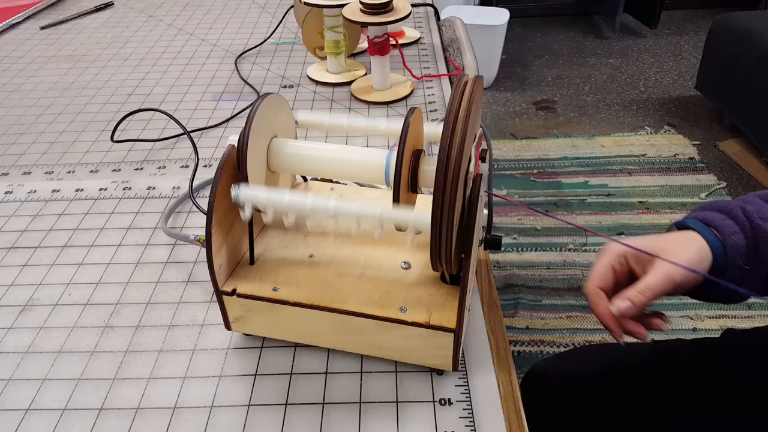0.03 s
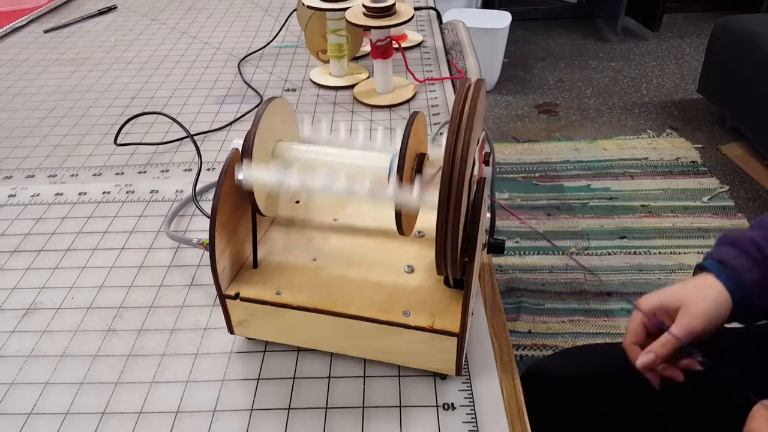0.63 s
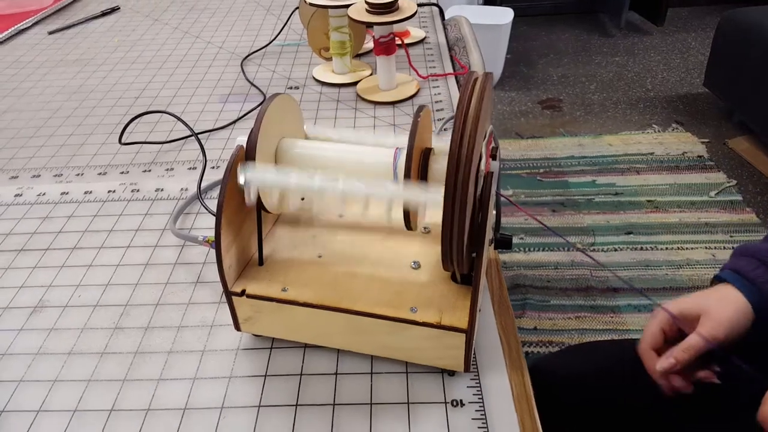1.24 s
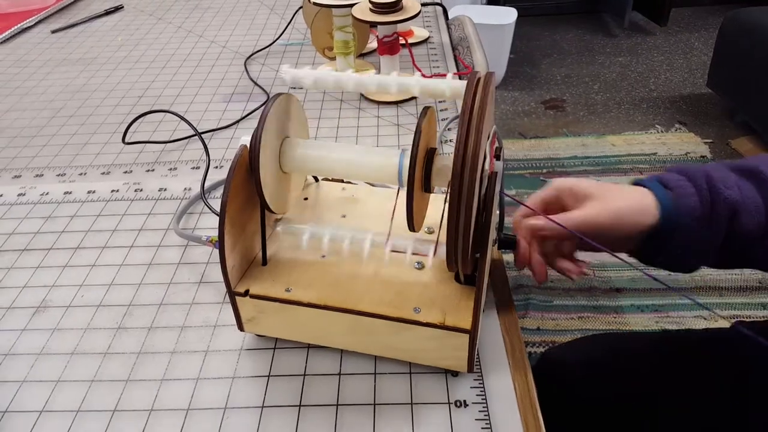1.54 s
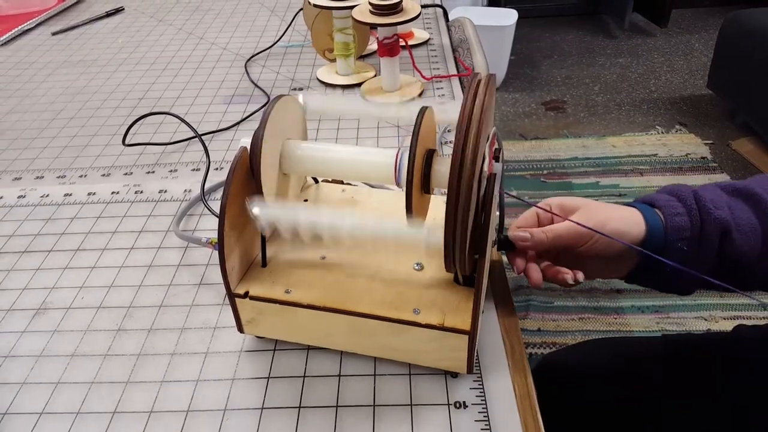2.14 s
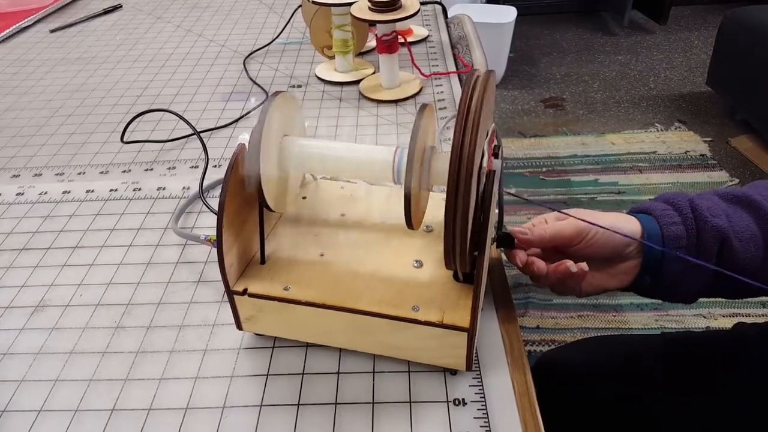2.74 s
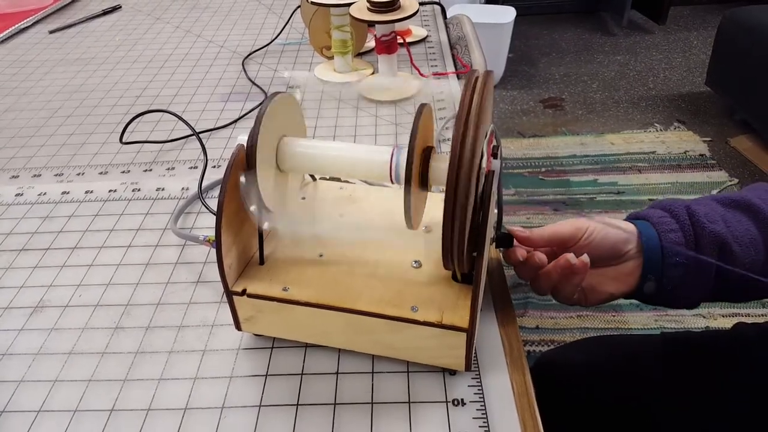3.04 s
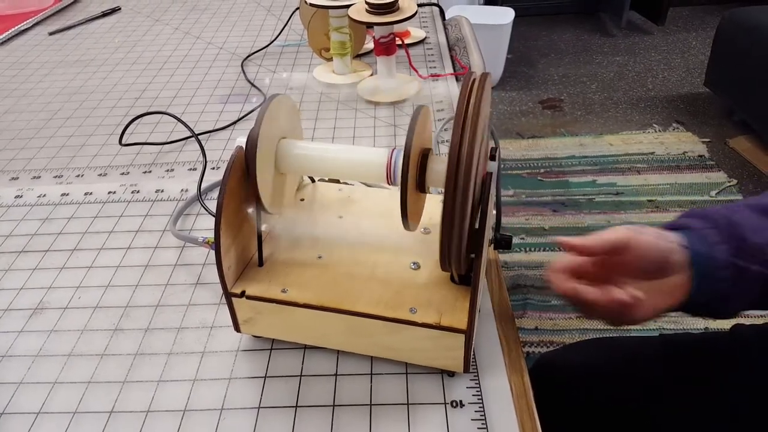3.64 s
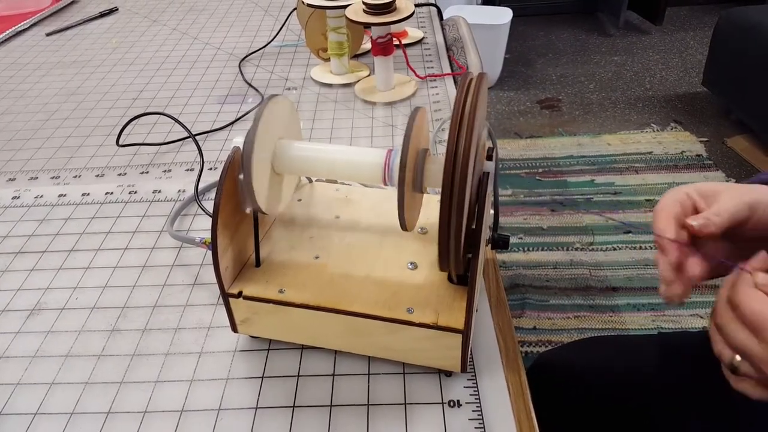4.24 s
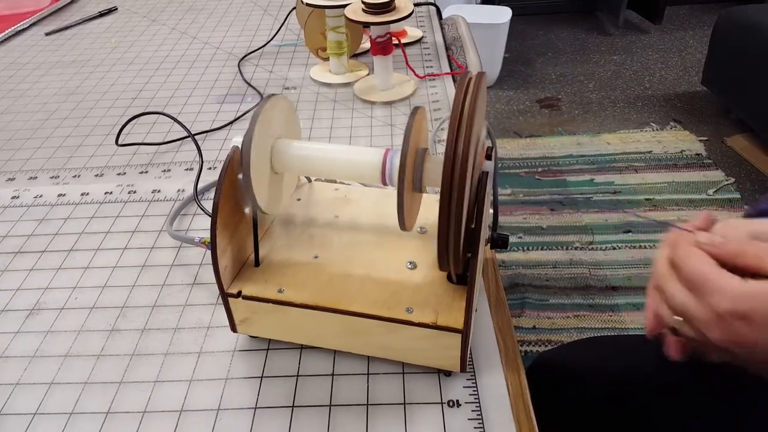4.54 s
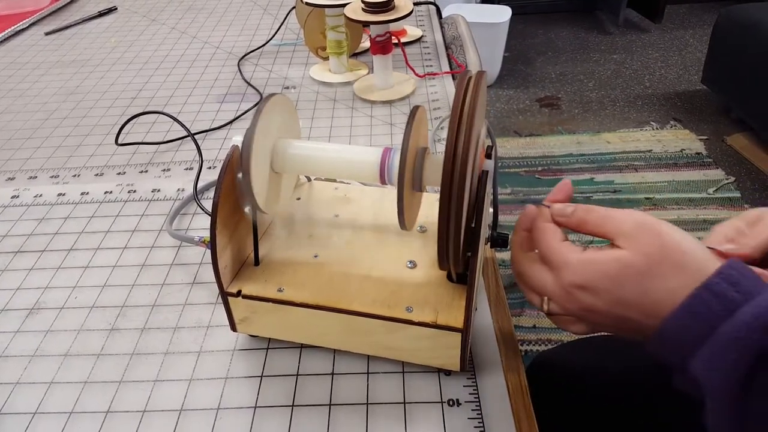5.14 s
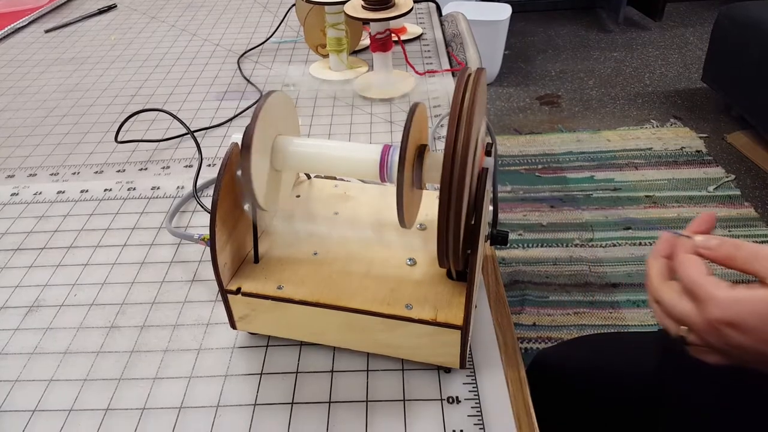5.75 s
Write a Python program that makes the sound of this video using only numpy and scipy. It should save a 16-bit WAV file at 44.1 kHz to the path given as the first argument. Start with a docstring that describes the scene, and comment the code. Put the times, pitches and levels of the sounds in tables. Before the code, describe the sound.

An electric spinning wheel hums, then speeds up into a rising whine with hissing yarn and a wooden bobbin rattling.

```python
"""An electric spinning wheel runs on a table, close by in a small room. At first it turns slowly, and
its speed controller chops the motor current, which hums at a nearly fixed pitch over scraping brushes.
After two seconds the knob is turned up: the motor whine climbs, the frame bumps, and yarn and brake band
hiss louder on the whirling flyer (the arm that winds the yarn). Then the loose bobbin knocks and
chatters in the wooden frame. Near full speed the brake band rasps and the table drones."""
import sys
import numpy as np
from scipy import signal
from scipy.fft import rfft, irfft, next_fast_len
from scipy.io import wavfile
from scipy.ndimage import uniform_filter1d, map_coordinates

SR = 44100
rng = np.random.default_rng(int(sys.argv[2]) if len(sys.argv) > 2 else 0)


def store_wav(level_fs):
    """Save 16-bit WAV to argv[1]."""
    pcm = np.round(np.clip(np.atleast_2d(level_fs), -1, 1) * 32767)
    wavfile.write(sys.argv[1], SR, pcm.T.astype(np.int16))


N = 254898
T = np.arange(N) / SR

# Table levels are relative. Pan is left minus right. Speed runs from 0 (slowest) to 1 (fastest).
# how fast the motor turns: (time [s], shaft rate [turns/s])
SHAFT_RATE = [(0, 59.4), (2.03, 59.4), (2.35, 91), (2.6, 100), (3.3, 117), (3.9, 139), (4.3, 145.4),
              (4.85, 146.8), (5.4, 144.4), (5.78, 143.6)]
# the chopping slows at each twist of the knob: (time [s], length [s], drop [Hz])
KNOB_SAGS = [(2.112, .09, 9.5), (2.7, .15, 10), (3.185, .115, 8.5)]
# tones of the hum: (multiple of the chopping rate, level when slow [dB], level when fast [dB], pan [dB])
HUM_TONES = [(1, -54.5, -57, 3.5), (2, -50, -50, -1), (3, -49.5, -46.5, 5), (4, -51.5, -43.5, 15.5),
             (5, -52, -46.5, 6), (6, -58.5, -59, 7), (8, -64, -50.5, 0), (9, -61.5, -78, 7.5),
             (10, -76.5, -85, -17), (11, -86, -80, -3)]
# how fast the hum trembles: (time [s], rate [Hz])
TREMBLE_RATE = [(0, 20), (.15, 18), (.35, 24), (.55, 22), (.87, 24.3), (1.03, 18.3), (1.2, 17.5),
                (1.45, 23.7)]
# how much it trembles: (multiple of the chopping rate, depth [share; negative swings the other way])
TREMBLE_DEPTHS = [(1, 0), (2, -.38), (3, .08), (4, .45), (5, -.33), (6, .15), (10, .15)]
# pitches where the casing boosts the hum: (pitch [Hz], half width [Hz], boost [dB])
CASING_PEAKS = [(1231, 18, 4.8), (4015, 40, 17)]
# rotor tones and their beats with the current: (multiple of the shaft rate, added multiple of the
# chopping rate, five levels [dB] for the speeds in WHINE_SPEEDS, roughness [0-1])
WHINE_TONES = [(1, 0, -87, -78, -73, -63, -59, .1), (2, 0, -65, -65, -65, -64, -62, .3),
               (5, 0, -79, -66, -53, -41.5, -43.7, .36), (5, 1, -72, -57, -52, -72, -76, .08),
               (3.75, 1, -85, -75, -66, -54, -62, .1), (7, 0, -70, -65, -59, -62, -62, .2),
               (11, 0, -85, -72, -60, -48, -49, .7), (15, 0, -90, -56, -56, -66, -72, .9),
               (15, -2, -77, -57, -52, -72, -80, .3), (24, 0, -47, -58, -66, -73, -75, .15)]
# how the motor housing shapes the brush noise: (frequency [Hz], level [dB])
HOUSING_COLOUR = [(100, -24), (205, -9), (260, -19), (540, -25), (700, -16), (800, -8), (1080, -17),
                  (1250, -1), (1340, -1), (1400, 3), (1500, -3), (1720, -.5), (1850, -3), (1930, -12),
                  (2030, -5), (2220, -4), (2330, -12), (2900, -19), (3900, -11), (4300, -14), (4620, -9),
                  (5100, -21), (5700, -13), (6450, -9), (7000, -24), (15000, -48)]
# rubbing of yarn and brake band: (frequency [Hz], left level [dB], right level [dB])
RUB_COLOUR = [(295, -8, -14), (970, 11, 5.5), (2380, 10.5, -1), (3970, 1.5, -1), (5460, -5, 0.5),
              (6640, -0.5, 3), (7800, 10, 3.5), (7700, 0.5, 2.5), (9130, 5.5, -4.5), (10300, -5, -12.5),
              (13600, -4, -10), (15000, -11, -31)]
# the shaking table top: (frequency [Hz], level [dB])
RUMBLE_COLOUR = [(20, -38), (40, -0.5), (68, 4.5), (115, 5), (165, 1), (200, 2), (240, 4.5), (340, -1),
                 (500, -3.5), (1000, -36), (4000, -60)]
# how the table's rumble grows: (time [s], level [dB])
RUMBLE_LEVEL = [(0, -56), (2.6, -56), (3.7, -50), (5.1, -48), (5.78, -45)]
# ringing tones of frame and bobbin: (pitch [Hz], time to fade by 60 dB [s], level [dB], pan [dB])
WOOD_TONES = [(294.7, 0.13, -26, -23), (468, 0.038, -14, -3), (596.5, 0.073, -7, 7), (665, 0.035, 2, 2.5),
              (736, 0.046, -4.5, -5.5), (793, 0.075, -23, -14), (1060, 0.017, -17, 20),
              (1460, 0.0096, -1, 6), (1580, 0.016, -23, -6), (2060, 0.02, -7, 0.5),
              (2650, 0.023, -16.5, -3)]
# dull bumps of the frame as the flyer gathers speed: (time [s], level [dB], pitch [Hz])
FRAME_BUMPS = [(2.041, -47, 280), (2.114, -44, 255), (2.203, -44.5, 265), (2.292, -43, 248),
               (2.37, -43, 280), (2.468, -45, 250), (2.555, -42, 570), (2.699, -46, 277), (2.84, -42, 248),
               (2.983, -40, 530), (3.177, -45, 237), (3.305, -47, 250)]
# the loudest bobbin knocks: (time [s], wooden boom [dB], hard clack [dB])
BOBBIN_KNOCKS = [(2.794, -38.5, -46), (2.886, -43.5, -45), (3.008, -43.5, -35), (3.139, -37.5, -41),
                 (3.3, -58, -57), (3.438, -36, -38), (3.484, -42, -35), (3.529, -43, -35.5),
                 (3.651, -35, -34.5), (3.692, -38.8, -32), (3.766, -35, -34), (3.846, -36, -38),
                 (3.899, -38, -29), (3.961, -38, -47), (4.041, -40, -35), (4.102, -35.5, -49),
                 (4.146, -36, -36), (4.24, -37, -35), (4.264, -46, -34), (4.304, -33, -39),
                 (4.388, -33, -35), (4.421, -48, -35), (4.461, -39, -40.8), (4.509, -29, -30.5),
                 (4.562, -37.5, -45), (4.597, -30.5, -34), (4.649, -35, -32.9), (4.69, -32, -42),
                 (4.714, -35.5, -41.2), (4.74, -48, -39.6), (4.778, -31.5, -45), (4.816, -28, -30),
                 (4.866, -45, -43), (4.908, -28.5, -37.7), (4.942, -32.7, -38), (4.979, -38.5, -34),
                 (5.02, -30, -25.5), (5.042, -29, -33.1), (5.065, -50, -32), (5.113, -30, -42.0),
                 (5.16, -50, -46), (5.196, -39, -42), (5.219, -31, -31), (5.266, -33, -34),
                 (5.308, -51, -33.5), (5.346, -30, -34.5), (5.382, -31, -34), (5.411, -39, -31),
                 (5.464, -28.5, -34), (5.49, -36.0, -31.5), (5.523, -32.8, -43), (5.552, -31.5, -35),
                 (5.594, -47, -28), (5.629, -43, -32), (5.668, -31.5, -31), (5.696, -38, -29.5),
                 (5.731, -36.5, -50), (5.757, -34.6, -31.5)]
# the rasping brake band: (frequency [Hz], level [dB])
BRAKE_COLOUR = [(1200, -22), (2700, -1), (4700, 2.5), (6000, 2), (8000, -7.5), (15000, -25)]

CHOP_HZ = 410.4  # how often the controller switches the current on
BELT_RATIO = 6.2  # motor turns per flyer turn
WHINE_SPEEDS = (0, .45, .68, .92, 1)


def undb(db):
    """Turn decibels into a factor to multiply by."""
    return 10 ** (np.asarray(db) / 20)


def curve(points):
    """Join (time, value) points with straight lines."""
    return np.interp(T, *np.transpose(points))


def unit(x):
    """Scale a signal to an average power of 1."""
    return x / np.sqrt(np.mean(x ** 2))


def turns(hz):
    """The angle in radians of something that turns hz times a second."""
    return 2 * np.pi * np.cumsum(hz) / SR


def wander(rate):
    """A smooth random wobble of size about 1 that changes rate times a second."""
    grid = T[::32]
    size = max(int(1 / (rate * grid[1])), 2)
    smooth = uniform_filter1d(uniform_filter1d(rng.standard_normal(len(grid)), size), size)
    return np.interp(T, grid, unit(smooth))


def colour(x, spectrum):
    """Shape bass and treble by a table, one channel per level column, at an average power of 1."""
    hz, *columns = np.transpose(spectrum)
    size = next_fast_len(N)
    log_hz = np.log(np.arange(size // 2 + 1) * SR / size + 1)
    gains = undb([np.interp(log_hz, np.log(hz), db) for db in columns])
    return unit(irfft(rfft(x, size) * gains, size)[:, :N])


def stereo_noise(spread):
    """Noise shared by both ears, plus spread times as much of their own."""
    return unit(rng.standard_normal(N) + spread * rng.standard_normal((2, N)))


def pan(db, pan_db):
    """Left and right gains from a level and a left minus right difference."""
    return undb(db + np.array([[1], [-1]]) * pan_db / 2)


def with_speed(speed, slow, fast, full=1):
    """Slide from the slow value to the fast one, arriving when speed reaches full."""
    return slow + (fast - slow) * np.minimum(speed / full, 1)


def chop_rate(drift_hz=.454, glide_s=.02):
    """The controller's rate in Hz: it drifts a little and sags while the knob is twisted."""
    sag_hz = sum(drop * ((T >= s) & (T < s + length)) for s, length, drop in KNOB_SAGS)
    return CHOP_HZ + drift_hz * wander(8.97) - uniform_filter1d(1. * sag_hz, int(glide_s * SR))


def hum(chop_hz, shaft, flyer, speed, load, flutter_hz=40, hunt_hz=4.28):
    """Chopped current shakes the motor's coils; its pulses widen with speed, so the tones swap strength."""
    overall_db = 1.5 - 7 * speed ** 4 - 1.5 * load
    uneven = with_speed(speed, .8, .31)
    on_share = with_speed(speed ** 1.15, .414, .89)  # part of each chop in which current flows
    # the controller creeps ahead and drops back
    hunt = signal.sawtooth(2 * np.pi * hunt_hz * (T - .095), width=.75)
    chop = turns(chop_hz) + .45 * (1 - speed) * hunt
    # at low speed, a second tone just below a hum tone makes it tremble
    tremble = (1 - speed) ** 2 * np.exp(-1j * (turns(curve(TREMBLE_RATE)) + wander(18) / 2))
    out = np.zeros((2, N))
    for k, slow_db, fast_db, pan_db in HUM_TONES:
        share = min(k / 2, 1) ** 3  # the lowest tone stays nearly clean
        depth = uneven * share
        beat = tremble * np.interp(k, *np.transpose(TREMBLE_DEPTHS))
        # the real part shakes the level, the imaginary (1j) part shakes the pitch
        flutter = (.07 * depth + .32 * load * share) * (wander(flutter_hz) + 1j * wander(flutter_hz))
        ripple = .115 * depth * k * np.cos(shaft + k)
        throb = .3 * depth * np.cos(2 * flyer + k)
        phase = k * chop + throb - .6125 * k ** 2  # the casing smears each pulse: high tones come later
        tone = np.real((1 + beat + flutter + ripple) * np.exp(1j * phase))
        casing_db = sum(boost / (1 + ((k * chop_hz - hz) / width) ** 2)
                        for hz, width, boost in CASING_PEAKS)
        pulse_db = 10 * np.log10(np.sin(np.pi * k * on_share) ** 2 + .61)
        level_db = overall_db + with_speed(speed, slow_db, fast_db) + pulse_db + casing_db
        out += pan(level_db, pan_db) * tone
    return np.sqrt(2) * out


def whine(shaft_hz, shaft, chop, flyer, speed, sway_rad=.06, flutter_hz=45, frame_hz=733, width_hz=9):
    """The rotor sings, swayed by the belt each flyer turn; a tone that meets the frame's pitch swells."""
    out = 0
    for k, beat, *levels_db, rough in WHINE_TONES:
        flutter = 1 + rough * (wander(flutter_hz) + 1j * wander(flutter_hz))
        phase = k * (shaft + sway_rad * np.sin(flyer)) + beat * chop
        pitch_hz = k * shaft_hz + beat * CHOP_HZ
        boost_db = 5.5 / (1 + ((pitch_hz - frame_hz) / width_hz) ** 2)
        level_db = np.interp(speed, WHINE_SPEEDS, levels_db) + boost_db
        out += undb(level_db) * np.real(flutter * np.exp(1j * phase))
    return np.sqrt(2) * out * pan(0, pan_db=2.5)


def brushes(shaft, chop, flyer, speed, load, sway_rad=.04):
    """The motor's brushes scrape the same worn spots each turn: a gritty buzz that rings the housing."""
    wear = rng.standard_normal(260)
    angle = shaft + sway_rad * np.sin(flyer)
    grit = unit(map_coordinates(wear, [angle / (2 * np.pi) * len(wear)], mode="grid-wrap"))
    repeating = with_speed(speed, .28, .08, full=.97)
    scrape = np.sqrt(repeating) * grit + np.sqrt(1 - repeating) * stereo_noise(spread=.43)
    pulsing = 1 + .25 * np.cos(chop)  # follows the chopped current
    level_db = with_speed(speed, -45.5, -41.5) + 2 * load
    return colour(scrape * pulsing, HOUSING_COLOUR) * pan(level_db, pan_db=5)


def hiss(chop, flyer, speed, full_speed=.75, swish_db=-1.77, flicker_db=1.16):
    """Yarn and brake band rub on the bobbin, louder with speed and swelling with each flyer turn."""
    level_db = with_speed((speed / full_speed) ** 1.13, -56.5, -36)
    level_db += swish_db * np.sin(flyer) + flicker_db * wander(57)
    buzz = 1 + .035 * np.cos(chop)
    rub = colour(stereo_noise(spread=15) * buzz, RUB_COLOUR)
    return rub * pan(level_db, pan_db=with_speed(speed, -7.5, -5, full=.39))


def table_rumble(flyer, speed, throb_db=-1):
    """The unbalanced flyer shakes the table top, which rumbles, and drones near full speed."""
    shaking = stereo_noise(spread=.21) * undb(throb_db * np.sin(flyer))
    rumble = colour(shaking, RUMBLE_COLOUR) * undb(curve(RUMBLE_LEVEL))
    drone = sum(np.sin(k * flyer) * (1 + wander(12) / 2) for k in (3, 5, 7))
    return rumble + undb(-57) * speed ** 4 * drone


def ring(pushes, hz, fade_s):
    """Each push starts a tone that fades by 60 dB in fade_s and gives off little below its pitch."""
    t = np.arange(SR // 5) / SR
    swing = np.sin(2 * np.pi * hz * t) * np.exp(-np.log(1000) * t / fade_s)
    return signal.oaconvolve(pushes, unit(np.diff(swing)) / np.sqrt(len(t)))[:N]


def wooden_frame(boom, clack, split_hz=950, treble_hz=4200):
    """Soft pushes ring the frame's low tones, hard hits its high ones; wood on wood has little treble."""
    out = np.zeros((2, N))
    for hz, fade_s, db, pan_db in WOOD_TONES:
        push = boom if hz < split_hz else clack
        out += pan(db, pan_db) * ring(push, hz, fade_s)
    return signal.sosfilt(signal.butter(2, treble_hz, fs=SR, output="sos"), out)


def chatter(flyer, speed, taps_per_s=700, scatter_db=3, swing_db=3):
    """The bobbin taps in its loose bearings, hardest as the flyer swings through its heavy side."""
    taps = (rng.random(N) < taps_per_s / SR) * rng.choice([-1, 1], N)
    taps = taps * undb(scatter_db * np.clip(rng.standard_normal(N), -2, 2) + swing_db * np.sin(flyer))
    level_db = with_speed(speed, -66, -36.8, full=.95)
    return unit(wooden_frame(taps, taps * undb(-1))) * undb(level_db)


def bumps(fade_s=.07, boost_db=26, wood_db=-11):
    """The frame rocks on the table: a dull low ring with a light knock of wood."""
    pushes = [undb(db + boost_db) * signal.unit_impulse(N, int(s * SR)) for s, db, _ in FRAME_BUMPS]
    thuds = sum(ring(push, hz, fade_s) for push, (_, _, hz) in zip(pushes, FRAME_BUMPS))
    wood = undb(wood_db) * sum(pushes)
    return thuds + wooden_frame(wood, wood)


def knocks(boom_db=23, clack_db=27, push_s=.0009, rise_s=.001, judder_s=.016, skid_s=.007):
    """The bobbin skids on its shaft with a clack; a soft push and a longer judder boom in the frame."""
    boom, clack = np.zeros((2, N))
    t = np.arange(SR // 16) / SR
    push = np.sin(np.pi * t / push_s) ** 2 * (t < push_s)
    push = .6 * push / push.sum()
    for s, low_db, high_db in BOBBIN_KNOCKS:
        stutter = rng.standard_normal(len(t)) * np.minimum(t / rise_s, 1)
        judder = unit(stutter * np.exp(-t / judder_s)) / np.sqrt(len(t))
        skid = unit(stutter * np.exp(-t / skid_s)) / np.sqrt(len(t))
        at = int(s * SR)
        boom[at:at + len(t)] += undb(low_db + boom_db) * (push + judder)[:N - at]
        clack[at:at + len(t)] += undb(high_db + clack_db) * skid[:N - at]
    return wooden_frame(boom, clack)


def rasp(flyer, speed, from_speed=.744, speed_span=.091, swish_db=3, flicker_db=2):
    """Near full speed the brake band starts to rasp on the bobbin."""
    grip = np.clip((speed - from_speed) / speed_span, 0, 1)
    level_db = -43 + swish_db * np.sin(flyer) + flicker_db * wander(64)
    return grip * colour(rng.standard_normal((2, N)), BRAKE_COLOUR) * pan(level_db, pan_db=-4)


def room(x, fade_s=.36, echo_db=-11):
    """The walls add a short wash of echoes, different at each ear."""
    t = np.arange(SR // 2) / SR
    tail = rng.standard_normal((2, len(t))) * np.exp(-np.log(1000) * t / fade_s) * (t > .003)
    return x + undb(echo_db) * signal.oaconvolve(x, unit(tail) / np.sqrt(len(t)), axes=1)[:, :N]


def scene():
    """The shaft speed drives whine, hiss, chatter and drone; the controller sets the hum's pitch."""
    shaft_hz, chop_hz = curve(SHAFT_RATE), chop_rate()
    shaft, chop = turns(shaft_hz), turns(chop_hz)
    flyer = shaft / BELT_RATIO
    speed = (shaft_hz - shaft_hz.min()) / np.ptp(shaft_hz)
    pull = np.maximum(uniform_filter1d(np.gradient(speed), SR // 2), 0)
    load = np.sqrt(pull / pull.max())  # 0 coasting, 1 speeding up hardest
    motor = hum(chop_hz, shaft, flyer, speed, load)
    motor += whine(shaft_hz, shaft, chop, flyer, speed)
    motor += brushes(shaft, chop, flyer, speed, load)
    rubbing = hiss(chop, flyer, speed) + rasp(flyer, speed)
    rumble = table_rumble(flyer, speed)
    wood = chatter(flyer, speed) + bumps() + knocks()
    left, right = motor + rubbing + rumble + room(wood)
    # the wheel stands a little to the left, so the right ear hears it later
    return np.array([left, np.roll(right, 4)])


def record(dry, start_s=.141, dip_db=-5.5, settle_s=.32, top_hz=15600):
    """After a short silence the sound starts a little low and creeps up; the highest treble is cut."""
    opening = (T >= start_s) * undb(dip_db * np.exp(-T / settle_s))
    treble_cut = signal.ellip(10, .2, 80, top_hz, fs=SR, output="sos")
    return signal.sosfilt(treble_cut, dry * opening)


dry = scene()
out = record(dry)
store_wav(out)
```